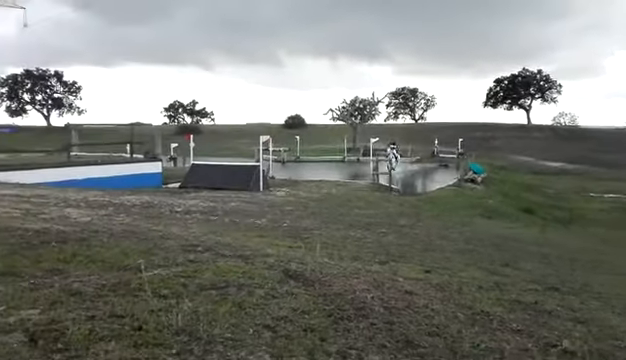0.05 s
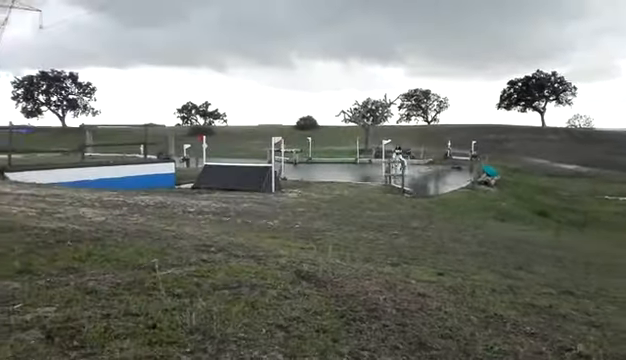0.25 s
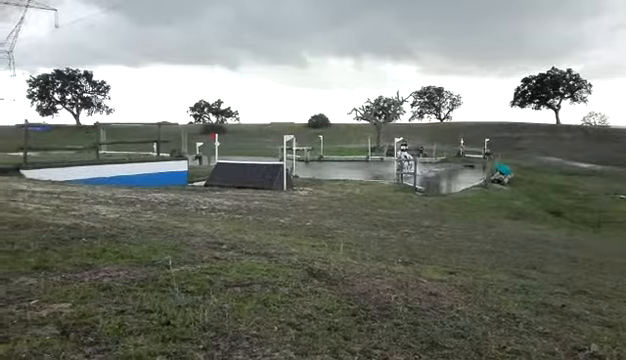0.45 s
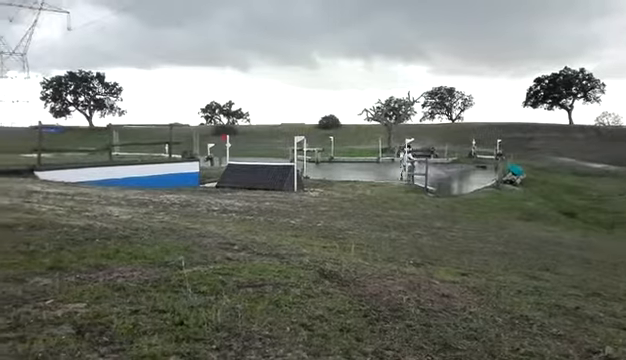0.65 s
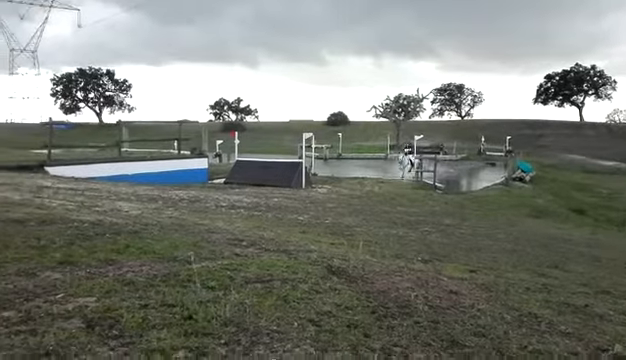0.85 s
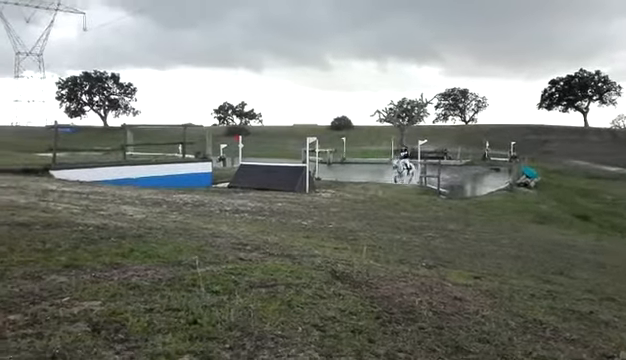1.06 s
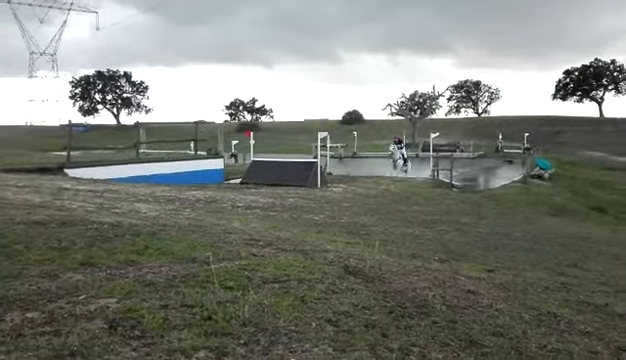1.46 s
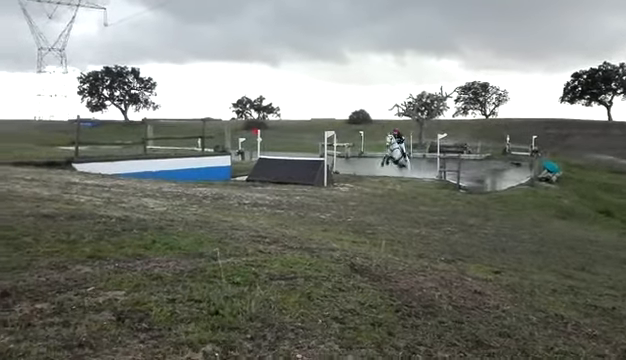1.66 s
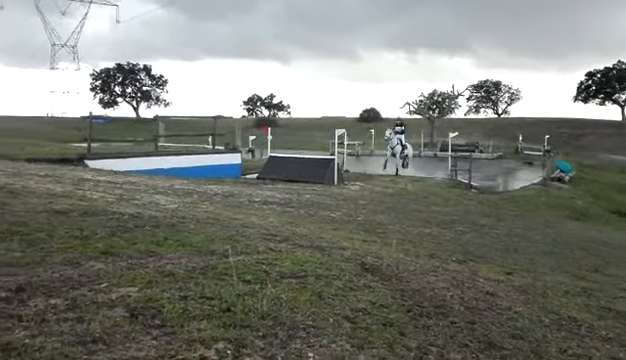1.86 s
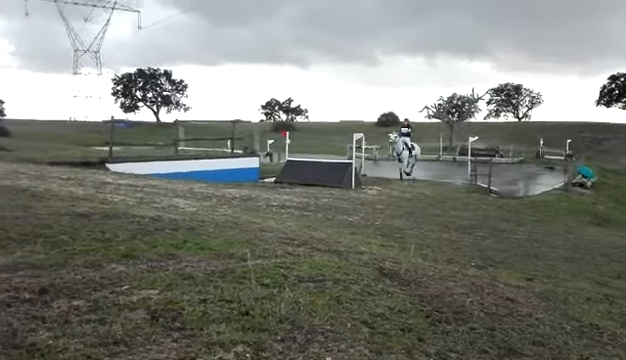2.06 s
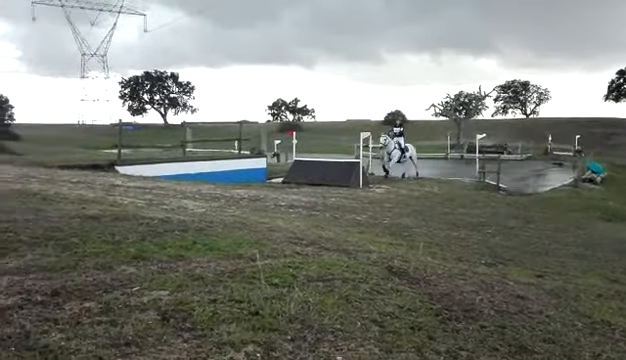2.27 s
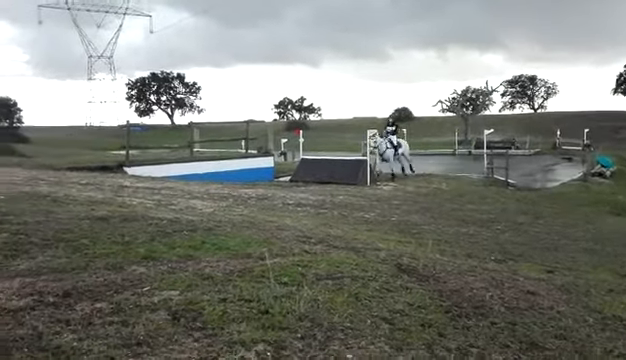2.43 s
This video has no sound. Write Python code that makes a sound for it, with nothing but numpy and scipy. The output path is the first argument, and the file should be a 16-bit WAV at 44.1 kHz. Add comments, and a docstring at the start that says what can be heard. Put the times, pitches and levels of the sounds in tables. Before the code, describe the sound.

Wind rumbles and flutters on the microphone throughout, in uneven low thumps. Beneath it, a horse splashes through shallow water, with light hoof slaps and droplets for the first 1.5 seconds. A stronger gust then hits and ends in one sharp, dry, close knock at 1.5 seconds, the loudest moment. Duller, distant spray follows and fades by about 2.2 seconds as the wind eases. There is no echo.

```python
"""Wind rumbles on a camera microphone in an open field while a horse canters through a shallow pond.
Eddies thump and flutter; hoof slaps ring trapped air, and droplets surge out of a splashy rustle.
A gust slaps the microphone and ends in one sharp, dry knock. Duller, distant spray then dies away
under the wind. Nearly mono, no echo."""
import sys
import numpy as np
from scipy import signal
from scipy.fft import rfft, irfft, next_fast_len
from scipy.io import wavfile
from scipy.ndimage import uniform_filter1d, map_coordinates

SR = 44100
rng = np.random.default_rng(int(sys.argv[2]) if len(sys.argv) > 2 else 0)


def put_to_file(sound):
    """Save the sound as 16-bit audio at rate SR, in the file named by the first command-line argument."""
    columns = np.atleast_2d(sound).T  # one column per channel
    safe = np.clip(columns, -1, 1)
    whole_steps = np.round(safe * 32767)
    wavfile.write(sys.argv[1], SR, whole_steps.astype(np.int16))


N = 110250

# wind envelopes: time_s, level_db
GUST_LEVEL = [(0, -32), (.3, -30.5), (.38, -24), (.57, -30.5), (.66, -28.5), (.95, -24), (1.1, -30),
              (1.39, -28), (1.48, -21), (1.68, -33.5), (1.8, -31.5), (2.0, -34.5), (2.23, -33.5),
              (2.5, -37)]
RUMBLE_LEVEL = [(0, -41), (.14, -39), (.2, -30.5), (.42, -32), (.5, -37), (.57, -30.5), (.85, -27.5),
                (1.12, -33.5), (1.2, -26.5), (1.29, -35.5), (1.47, -27), (1.69, -35), (1.85, -29),
                (2.0, -36.5), (2.22, -30), (2.31, -39.5), (2.39, -33), (2.5, -38)]
FLUTTER_LEVEL = [(0, -60), (.5, -51.5), (.58, -41), (.7, -50.5), (.8, -42), (.98, -41.5), (1.13, -48.5),
                 (1.45, -46.5), (1.7, -66), (1.85, -50), (2.0, -65.5), (2.22, -63.5), (2.33, -67)]
# eddies hitting the microphone: centre_s, half_length_s, push_db, puff_db
EDDY_HITS = [(0.423, 0.0037, -13, -45), (0.525, 0.0071, -16.5, -60), (.59, 0.0032, -16, -41),
             (0.646, 0.0028, -25, -31), (0.666, 0.0049, -15, -52), (0.731, 0.002, -16.5, -25.5),
             (0.765, 0.00087, -34, -29.5), (0.837, 0.0046, -10.5, -47), (0.984, 0.0022, -40, -32),
             (1.342, 0.0015, -15, -30.5), (1.4143, 0.00061, -23, -22.5), (1.421, 0.0015, -20, -28.5),
             (1.4502, 0.0018, -4, -18.5), (1.4542, 0.0032, -4.5, -16), (1.4769, 0.0008, -9.5, -14.5),
             (1.4822, 0.0033, -27, -18), (1.488, 0.0016, -15.5, -26), (1.5075, 0.0016, -7.5, -20.5),
             (1.5515, 0.0024, -13, -42), (1.606, 0.003, -17, -38.5), (1.626, 0.0071, -24, -40),
             (1.84, 0.0012, -32, -35.5), (1.846, 0.0022, -18, -39), (2.102, 0.0012, -18.5, -45),
             (2.21, 0.0011, -21, -45)]
# contacts at the camera: start_s, level_db
CONTACTS = [(0.3066, -31), (0.9, -34), (.926, -29), (1.5012, -30.5), (1.5055, -12), (1.5073, 3)]
# near surges of water: start_s, length_s, body_db, fizz_db
NEAR_SURGES = [(0.041, 0.0097, -38, -48), (0.057, 0.013, -36.5, -57), (0.093, 0.025, -42, -56),
               (0.155, 0.007, -39.5, -86), (0.165, 0.063, -54, -53.5), (0.194, 0.0046, -38, -66),
               (0.309, 0.012, -37.5, -48.5), (0.334, 0.0094, -38.5, -51.5), (0.47, 0.01, -36, -68),
               (0.613, 0.066, -51, -49), (0.634, 0.036, -39, -44.5), (0.761, 0.0041, -31.5, -74),
               (0.897, 0.007, -41, -38.5), (1.043, 0.025, -40.5, -47.5), (1.165, 0.12, -46, -44),
               (1.202, 0.016, -34.5, -40.5), (1.369, 0.012, -40, -58)]
# hooves on water: time_s, pitch_hz, pocket_db
HOOF_SLAPS = [(.061, 3300, -36), (.157, 3400, -33), (.197, 4000, -34), (.476, 2800, -31.5),
              (1.21, 3300, -27.5)]
# distant splashes: start_s, length_s, slosh_db, spray_db
FAR_SPLASHES = [(1.581, 0.0067, -67, -42), (1.596, 0.065, -73, -50.5), (1.689, 0.007, -73, -43.5),
                (1.767, 0.042, -53, -73), (1.857, 0.032, -45, -57), (1.9, 0.018, -48.5, -65),
                (1.943, 0.038, -75, -51.5), (2.057, 0.0037, -52, -36.5)]
# steady water envelopes: time_s, level_db
RUSTLE_LEVEL = [(0, -50.5), (.08, -46), (.27, -51), (.5, -48.5), (.58, -51), (.72, -47), (.85, -51),
                (1.0, -52), (1.13, -48.5), (1.23, -58), (1.31, -50), (1.42, -47), (1.5, -38.5), (1.53, -56),
                (1.6, -78)]
SPRAY_LEVEL = [(1.45, -83), (1.51, -66), (1.565, -60), (1.605, -48.5), (1.66, -55.5), (1.76, -56.5),
               (1.82, -56.5), (1.87, -51), (1.92, -56.5), (1.96, -54), (2.06, -60.5), (2.2, -67),
               (2.3, -75.5), (2.5, -69)]
# ground reflection of the spray: time_s, gain_db
GROUND_GAIN = [(2.02, -16), (2.14, -11.5)]
# stereo width of the water: freq_hz, side_over_mid_db
WATER_WIDTH = [(3000, -91), (6000, -18), (8500, -3), (11000, -11.5), (14000, -6)]
# source spectra: freq_hz, relative_db
GUST_SPECTRUM = [(15, -18), (30, 2), (80, 1.5), (140, -8), (350, -52), (3000, -120)]
RUMBLE_SPECTRUM = [(60, -12), (120, 0), (190, -2.5), (300, -11.5), (420, -21), (600, -31.5), (1200, -44),
                   (6000, -75)]
PUFF_SPECTRUM = [(100, -4), (300, 13), (450, -5.5), (630, -4), (830, -2), (1100, -5), (1400, -8.5),
                 (1800, -13), (2800, -33), (5500, -59.5), (12000, -90.5)]
KNOCK_SPECTRUM = [(300, -6.5), (2400, -24.5), (2750, -22), (3100, -7), (3700, -3.5), (4900, -1),
                  (6200, -10.5), (6800, -7.5), (7600, -10), (8400, -23), (10000, -18.5), (11300, -16.5),
                  (14000, -18), (15500, -49.5)]
RUSTLE_SPECTRUM = [(300, -12), (800, -6.5), (2000, -1), (2500, -5), (3100, 2), (4000, 1.5), (5000, -4),
                   (5350, -17), (5650, -13), (6050, -8.5), (9400, -12.5), (11500, -24), (14000, -21)]
FIZZ_SPECTRUM = [(2000, -29), (4900, 4), (5450, -14), (6200, -3), (8000, -3), (9500, -0.5), (11500, -17),
                 (13000, -13), (14200, -12.5)]
SLOSH_SPECTRUM = [(400, -27), (1000, -22), (1500, 5.5), (1950, 10), (2600, -3), (4000, -3), (8000, -33.5),
                  (14000, -57)]
SPRAY_SPECTRUM = [(300, -10), (1000, -12), (1900, -2), (2650, -6), (3150, -0.5), (4200, 1.5), (5900, -1),
                  (6900, -8), (8000, -10.5), (10000, -17), (11500, -26.5), (14000, -26.5)]
AIR_SPECTRUM = [(100, 4), (700, -14), (2000, -29), (5000, -35), (9000, -42), (14000, -33)]

WASH_TRIM_DB, WATER_TOP_HZ = -0.6, 14300


def wind():
    """Big eddies thump, smaller ones rumble in lumps; their pressure peaks tear off a rough flutter."""
    gusts = steady(noise(GUST_SPECTRUM))
    rumble = steady(noise(RUMBLE_SPECTRUM) * amp(4 * wobble(knots_per_s=45)))
    flutter = unit(noise(PUFF_SPECTRUM) * np.abs(rumble) ** 1.12)
    return gain(GUST_LEVEL) * gusts + gain(RUMBLE_LEVEL) * rumble + gain(FLUTTER_LEVEL) * flutter


def buffets():
    """Each eddy pushes, then sucks at the microphone, with a puff of noise."""
    out, puff = np.zeros(N), noise(PUFF_SPECTRUM)
    for centre_s, half_length_s, push_db, puff_db in EDDY_HITS:
        offset = (clock() - centre_s) / half_length_s
        push = -np.sin(np.pi / 2 * offset) * np.exp(-(offset / 1.91) ** 2)
        out += amp(push_db) * push + amp(puff_db) * puff * np.exp(-offset ** 2 / 2)
    return out


def knocks(scrape_end_s=1.507, scrape_rise_s=.0042, scrape_db=-18.5):
    """Hard, dry contacts at the camera; a brief scrape swells into the loudest."""
    blows = np.zeros(N)
    for start_s, level_db in CONTACTS:
        blows[round(start_s * SR)] += amp(level_db)
    lead_s = scrape_end_s - clock()
    swell = (lead_s > 0) * np.exp(-np.abs(lead_s) / scrape_rise_s)
    scrape = amp(scrape_db) * swell * noise(KNOCK_SPECTRUM)
    return signal.fftconvolve(blows, impulse(KNOCK_SPECTRUM))[:N] + scrape


def rustle():
    """Churned water: a wash and droplets in quick surges, each with its own share of fizz."""
    body_power, fizz_power = gain(RUSTLE_LEVEL) ** 2, np.zeros(N)
    for start_s, length_s, body_db, fizz_db in NEAR_SURGES:
        shape = surge(start_s, length_s)
        body_power += (amp(body_db) * shape) ** 2
        fizz_power += (amp(fizz_db) * shape) ** 2
    wash = amp(WASH_TRIM_DB) * np.sqrt(body_power) * patter(RUSTLE_SPECTRUM, grain_db=2)
    fizz = np.sqrt(fizz_power) * patter(FIZZ_SPECTRUM, grain_db=1.5)
    return wash + fizz + droplets(body_power, RUSTLE_SPECTRUM, relative_db=-6)


def hoof_slaps(scatter_s=.003, max_detune=.35):
    """Each slap traps six air pockets that ring around one pitch."""
    out = np.zeros(N)
    for time_s, pitch_hz, pocket_db in HOOF_SLAPS:
        for delay, detune in rng.uniform(-1, 1, size=(6, 2)):
            age_s = clock() - time_s - scatter_s * delay
            out += amp(pocket_db) * bubble(pitch_hz * (1 + max_detune * detune), age_s)
    return out


def droplets(water_power, spectrum, relative_db, drops_per_s=1500, low_hz=1854, high_hz=7800):
    """Tiny drops ring briefly, following the water's level and colour."""
    start, pitch, size = rng.random((int(drops_per_s * N / SR), 3)).T
    age_s = np.arange(400) / SR
    pitch_hz = low_hz * (high_hz / low_hz) ** pitch[:, None]
    rings = amp(24 * size[:, None]) * bubble(pitch_hz, age_s)
    indices = (start[:, None] * N).astype(int) + np.arange(len(age_s))
    drops = np.bincount(indices.ravel(), rings.ravel(), N)[:N]
    return amp(relative_db) * np.sqrt(water_power) * unit(water_colour(drops, spectrum))


def bubble(pitch_hz, age_s, decay_cycles=3.9):
    """Trapped air: a damped ring with a soft start."""
    cycles = np.maximum(age_s, 0) * pitch_hz
    return np.sin(2 * np.pi * cycles) * np.exp(-cycles / decay_cycles) * (1 - np.exp(-cycles))


def distant_spray(ground_delay_s=.00098):
    """Water sloshes, trickles back and settles; a growing ground reflection makes it hollow."""
    slosh_power, spray_power = np.zeros(N), gain(SPRAY_LEVEL) ** 2
    for start_s, length_s, slosh_db, spray_db in FAR_SPLASHES:
        shape = surge(start_s, length_s)
        slosh_power += (amp(slosh_db) * shape) ** 2
        spray_power += (amp(spray_db) * shape) ** 2
    slosh = np.sqrt(slosh_power) * patter(SLOSH_SPECTRUM, grain_db=-4)
    wash = amp(WASH_TRIM_DB) * np.sqrt(spray_power) * patter(SPRAY_SPECTRUM, grain_db=2)
    water = slosh + wash + droplets(spray_power, SPRAY_SPECTRUM, relative_db=-7)
    reflection = filtered(water, lambda hz: np.exp(-2j * np.pi * hz * ground_delay_s))
    return water + gain(GROUND_GAIN) * reflection


def still_air(level_db=-65.5):
    """Faint, steady noise floor."""
    return amp(level_db) * noise(AIR_SPECTRUM)


def surge(start_s, length_s, attack_s=.0018):
    """Quick rise, rounded fall."""
    age_s = np.maximum(clock() - start_s, 0)
    return (1 - np.exp(-age_s / attack_s)) * np.exp(-(age_s / length_s) ** 2)


def patter(spectrum, grain_db):
    """Stereo noise of tiny uneven grains, wide only in the treble."""
    grains = rng.standard_normal((2, N)) * amp(grain_db * wobble(knots_per_s=900))
    mid, side = water_colour(grains, spectrum)
    side = filtered(side, lambda hz: response(WATER_WIDTH, hz))
    return unit(np.array([mid + side, mid - side]))


def water_colour(x, spectrum):
    """Shape to a spectrum, cut at WATER_TOP_HZ."""
    return filtered(x, lambda hz: response(spectrum, hz) * (hz < WATER_TOP_HZ))


def noise(spectrum):
    """Mono coloured noise, rms 1."""
    return unit(filtered(rng.standard_normal(N), lambda hz: response(spectrum, hz)))


def impulse(spectrum, size=2048):
    """Minimum-phase click, peak 1."""
    cepstrum = irfft(np.log(response(spectrum, np.fft.rfftfreq(size, 1 / SR))))
    cepstrum[1:size // 2] *= 2
    cepstrum[size // 2 + 1:] = 0
    click = irfft(np.exp(rfft(cepstrum)))
    return click / np.abs(click).max()


def filtered(x, gain_at_hz):
    """Zero-padded FFT filter."""
    size = next_fast_len(N + SR // 4)
    return irfft(rfft(x, size) * gain_at_hz(np.fft.rfftfreq(size, 1 / SR)), size)[..., :N]


def response(spectrum, hz):
    """Gain at hz, interpolated on a log axis."""
    freq_hz, level_db = np.transpose(spectrum)
    return amp(np.interp(np.log(hz + 1), np.log(freq_hz + 1), level_db))


def gain(envelope):
    """Per-sample gain from time_s, level_db rows."""
    return amp(np.interp(clock(), *np.transpose(envelope)))


def wobble(knots_per_s):
    """Smooth random curve."""
    return map_coordinates(rng.standard_normal(N // 10), [clock() * knots_per_s + 2])


def steady(x):
    """Even out slow level swings."""
    return x / np.sqrt(np.abs(uniform_filter1d(x ** 2, size=2400)) + 1e-9)


def unit(x):
    """Scale to rms 1."""
    return x / np.sqrt(np.mean(x ** 2) + 1e-20)


def amp(db):
    """Decibels to gain."""
    return 10 ** (np.asarray(db) / 20)


def clock():
    """Sample times in seconds."""
    return np.arange(N) / SR


def scene():
    """Mono wind, knocks and air with slightly wider water."""
    return wind() + buffets() + knocks() + still_air() + rustle() + hoof_slaps() + distant_spray()


def record(dry, ceiling=.88, cutoff_hz=14800):
    """The camera rounds off the loudest peaks, then low-passes steeply."""
    limited = dry / (1 + (dry / ceiling) ** 10) ** (1 / 10)
    return filtered(limited, lambda hz: 1 / np.sqrt(1 + (hz / cutoff_hz) ** 110))


dry = scene()
out = record(dry)
put_to_file(out)
```